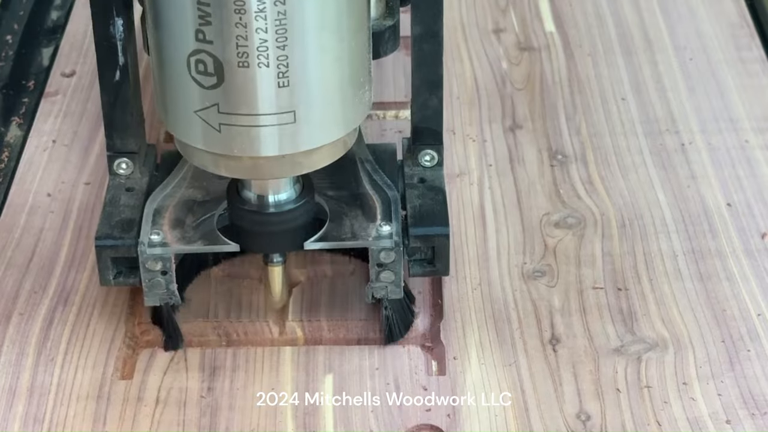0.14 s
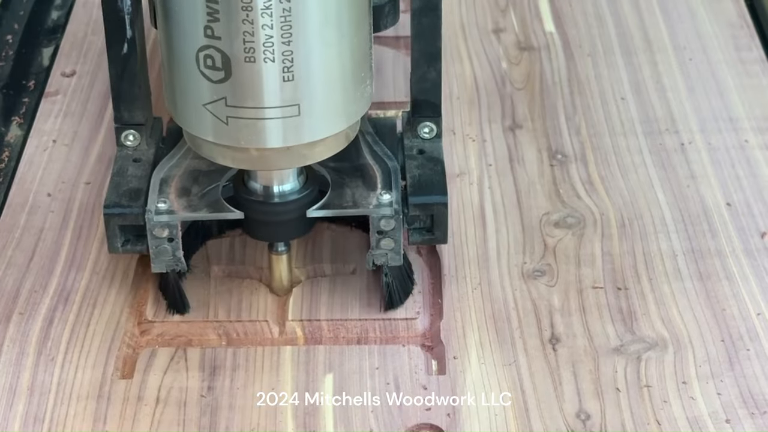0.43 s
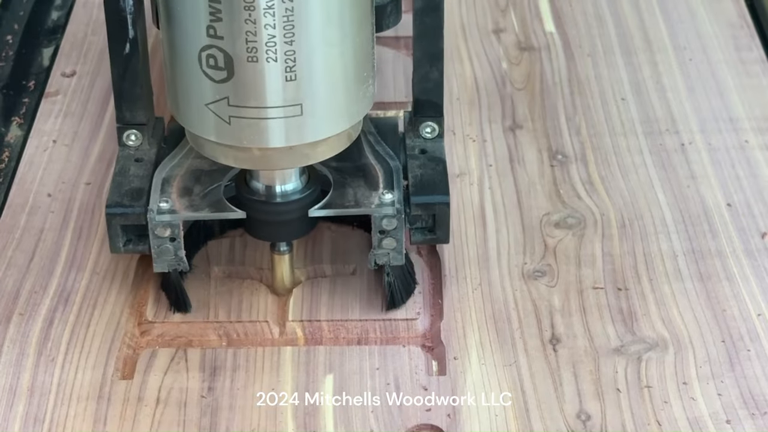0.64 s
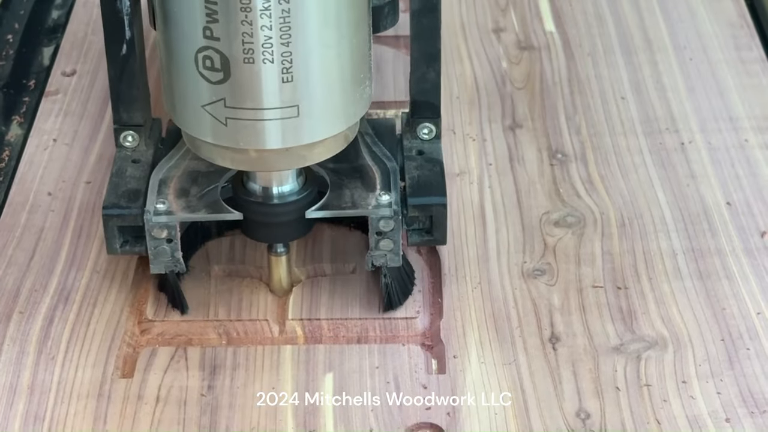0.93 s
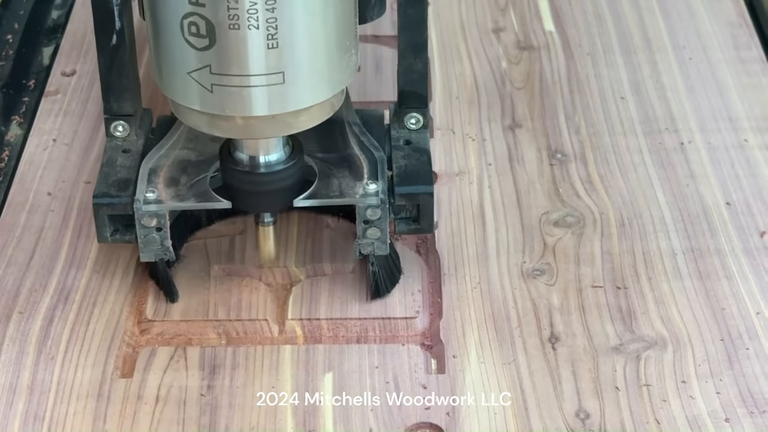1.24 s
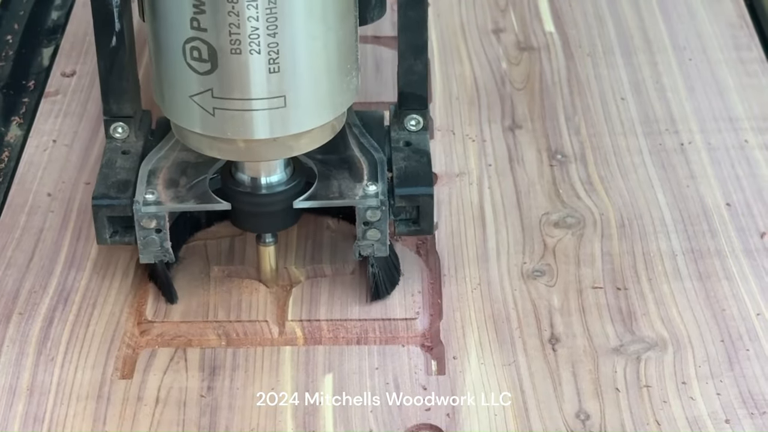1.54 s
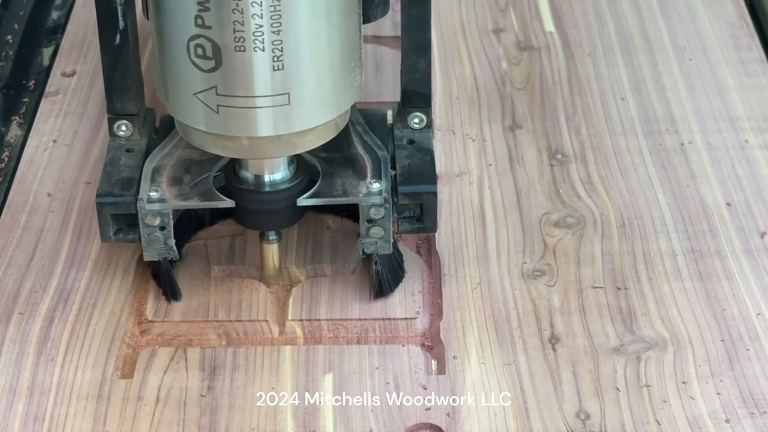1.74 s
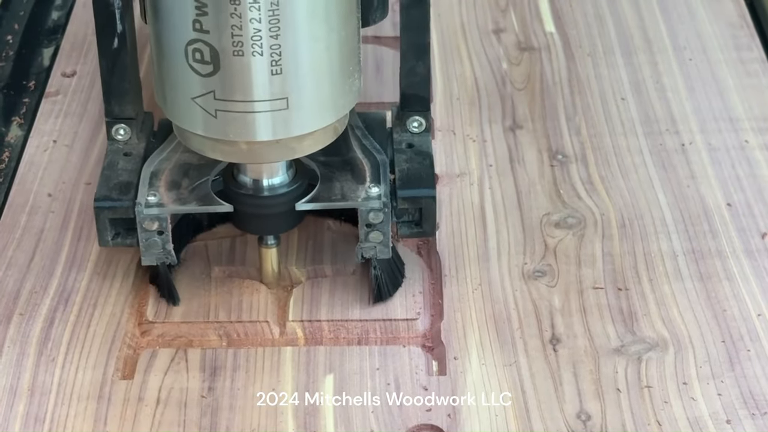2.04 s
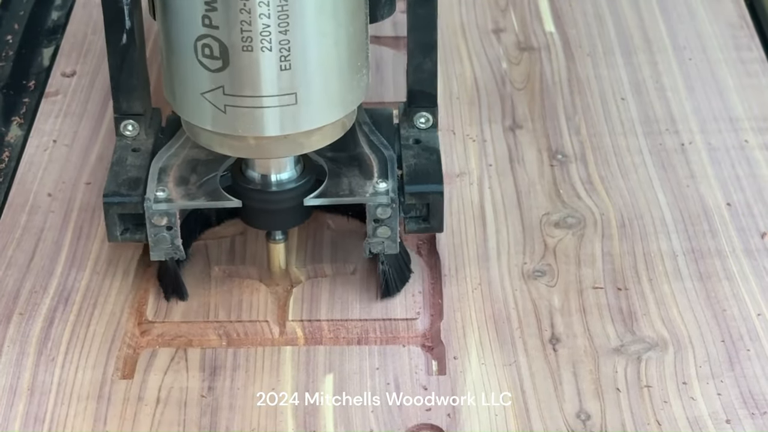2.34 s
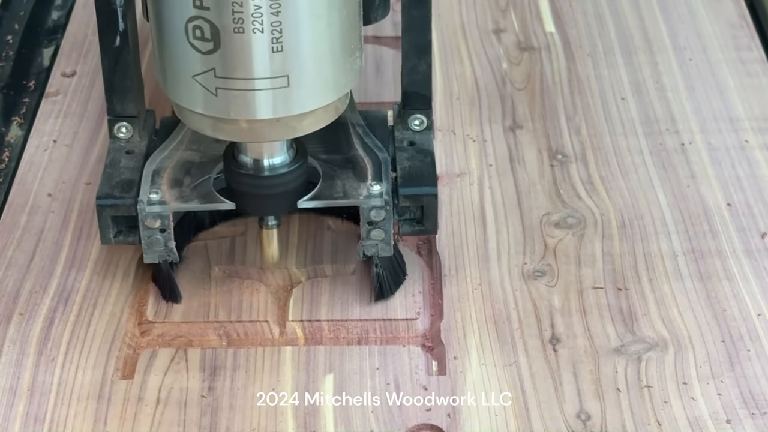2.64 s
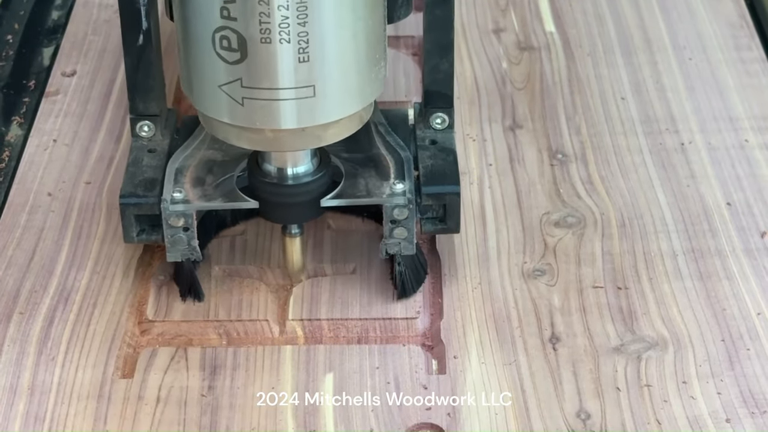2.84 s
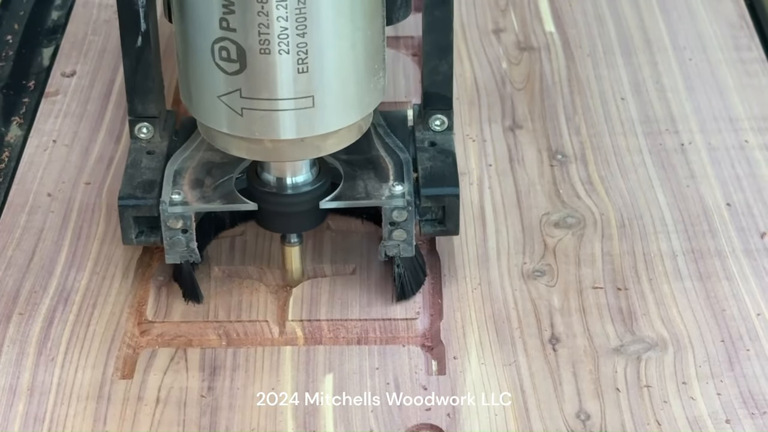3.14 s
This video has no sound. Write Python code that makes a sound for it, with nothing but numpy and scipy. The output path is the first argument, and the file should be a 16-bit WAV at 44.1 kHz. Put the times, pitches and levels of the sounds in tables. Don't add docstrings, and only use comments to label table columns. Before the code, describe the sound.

Close stereo pickup of a carving router in a small workshop: constant low hum and airy hiss, faint high whistle while moving, dull thumps at reversals, and brief crackling bursts as the bit bites wood.

```python
import sys
import numpy as np
from scipy import signal
from scipy.fft import rfft, irfft
from scipy.io import wavfile

SR = 44100
rng = np.random.default_rng(int(sys.argv[2]) if len(sys.argv) > 2 else 0)


def file_out(sig):
    cols = np.atleast_2d(sig).T
    lim = np.clip(cols, -1, 1)
    pcm = np.round(lim * 32767).astype(np.int16)
    wavfile.write(sys.argv[1], SR, pcm)


def elevation(decibels):
    levels = np.asarray(decibels, float)
    return 10 ** (levels / 20)


N = 145530
SPINDLE_HZ = 247.4


def rms_one(x):
    return x / np.sqrt(np.mean(x ** 2) + 1e-20)


def in_time(rows):
    s, *columns = np.transpose(rows)
    return [np.interp(np.arange(N) / SR, s, c) for c in columns]


def at_hz(points, hz):
    freq_hz, value = np.array(points).T
    return np.interp(np.log(hz + 1), np.log(freq_hz), value)


def drift(rate):
    r = np.exp(-80 * np.pi * rate / SR)
    white = rng.standard_normal(N // 40 + 2002)
    slow = signal.lfilter([1], [1, -2 * r, r * r], white)[2000:]
    return np.interp(np.arange(N) / 40, np.arange(len(slow)), rms_one(slow - slow.mean()))


def resonate(x, hz, width_hz):
    r = np.exp(-np.pi * width_hz / SR)
    zeros = np.array([1, 0, -1]) * (1 - r * r) / 2
    poles = [1, -2 * r * np.cos(2 * np.pi * hz / SR), r * r]
    return signal.lfilter(zeros, poles, x + 1e-18)


def gate(start, length, attack, release):
    t = np.arange(N) / SR - start
    return np.clip(t / attack, 0, 1) * np.exp(-np.maximum(t - length, 0) / release)


def tone(hz, db):
    return np.sqrt(2) * elevation(db) * np.sin(2 * np.pi * np.cumsum(hz + np.zeros(N)) / SR)


def spindle():
    # time_s, level_db
    load = [(0.0, -50.5), (0.45, -44.5), (0.5, -52), (0.66, -44.5), (0.75, -57), (0.84, -46), (1.3, -44.5),
            (1.38, -44), (2.2, -44), (2.89, -44.5), (2.9, -43), (2.97, -40), (2.99, -54), (3.05, -42),
            (3.08, -51), (3.17, -36.5), (3.21, -49), (3.3, -51)]
    level_db = in_time(load)[0] + 1.5 * drift(24.0)
    return tone(SPINDLE_HZ + 3.5 * drift(5.2), level_db)


def struck(modes, turns, depth, strength_db):
    rung = 0
    for j, (hz, width_hz, db) in enumerate(modes):
        colour = elevation(1.5 * drift(39))
        blows = np.zeros((2, N))
        blows[0, turns] = 1
        blows[1, turns] = (depth * colour)[turns] * elevation(strength_db)
        sign = -(-1) ** j
        rung = rung + sign * elevation(db) * resonate(blows, hz, width_hz)
    return rung[1] / rung[0].std()


def bit():
    # start_s, length_s, knock_db, ring_db, crack_db
    bites = [(.8984, 0.012, -39, -40, -45.5), (0.978, 0.0027, -48, -52, -54), (0.9824, 0.01, -39, -41, -46),
             (1.3602, 0.011, -47.5, -56, -63), (2.166, .008, -49, -60, -62),
             (2.177, 0.016, -42, -46.5, -55), (2.198, 0.0037, -48, -48, -52),
             (2.3333, 0.0018, -46, -53, -60), (2.3522, 0.0067, -49, -52, -51),
             (2.3848, 0.0043, -49, -49, -50), (2.3929, .018, -40.5, -43.5, -49),
             (2.415, 0.014, -37, -50, -53), (2.4327, 0.025, -41, -44, -70), (2.464, 0.0023, -49, -43, -53),
             (2.468, 0.011, -38.5, -54, -42), (2.4843, .003, -38, -46, -46),
             (2.487, 0.011, -39.5, -41, -54), (2.504, 0.014, -38, -41.5, -43.5),
             (2.532, 0.0033, -39, -53, -50), (2.5353, .009, -44, -48, -58), (3.143, 0.0017, -44, -57, -60)]
    # start_s, length_s, mode_1_db, mode_2_db, mode_3_db
    drums = [(.415, 0.035, -57, -61, -64), (.897, 0.017, -49, -53, -51.5), (.978, 0.014, -47, -41, -64),
             (1.345, 0.047, -48.5, -55, -60), (1.41, 0.15, -55.5, -57, -74), (1.64, 0.036, -56, -58, -60),
             (2.172, 0.026, -41.5, -48, -51), (2.40, 0.047, -40.5, -41, -46), (2.465, 0.075, -48, -47, -50),
             (2.885, .075, -53, -55, -59), (2.96, 0.18, -60, -56.5, -74)]
    grips = np.array([0, .8984, .9782, 1.3602, 2.166, 2.3327, 2.3522, 2.3848, 2.4637, 2.4826, 3.1457])
    # freq_hz, width_hz, level_db
    board = [
        (511, 33, -0.5),
        (761, 86, -0.5),
        (970, 93, 0),
    ]
    # freq_hz, width_hz, level_db
    knock = [(1280, 100, -11), (1490, 200, 4), (1720, 120, 1), (1956, 176, 3.5), (2153, 140, 2.5),
             (2610, 180, 0.5), (2300, 1320, -3)]
    # freq_hz, width_hz, level_db
    ring = [
        (2963, 108, 2),
        (3200, 220, 1),
    ]
    # freq_hz, width_hz, level_db
    crack = [(3700, 210, 5), (4070, 460, 6.5), (4300, 530, 0.5), (5570, 370, -5), (4300, 1700, -1.5),
             (6700, 2000, 0), (11100, 4000, -21)]
    attack_s, release_s, jitter_s, spread_db = 0.0044, 0.0025, 0.000015, 1.2

    t = np.arange(N) / SR
    latest_grip = np.searchsorted(grips, t + 0.5 / SPINDLE_HZ, "right") - 1
    gripped = t - grips[latest_grip]
    chance = rng.standard_normal((800, 2))
    bodies = [(bites, gripped, 2, knock), (bites, gripped, 3, ring), (bites, gripped, 4, crack)]
    bodies += [(drums, t, 2 + k, [mode]) for k, mode in enumerate(board)]
    out = 0
    for table, clock, column, modes in bodies:
        turns = np.flatnonzero(np.diff(np.floor(clock * SPINDLE_HZ)) == 1)[:800]
        turns = (turns + jitter_s * SR * chance[:, 0]).astype(int)
        depth = 0
        for row in table:
            contact = gate(row[0] - attack_s, row[1] + attack_s, attack_s, release_s)
            depth = depth + elevation(row[column]) * contact
        out = out + struck(modes, turns, depth, spread_db * chance[:, 1])
    return signal.sosfilt(signal.butter(2, 7500, fs=SR, output="sos"), out)


def gantry():
    # peak_s, level_db, pitch_hz
    thumps = [(0.427, -38, 263), (0.899, -34.5, 153), (1.44, -39.5, 223), (1.679, -34.5, 154),
              (1.844, -31.5, 175), (2.03, -38, 167), (2.2355, -34, 151), (2.2536, -27.5, 255),
              (2.469, -27, 264), (2.501, -37, 135), (3.047, -33, 260), (3.052, -42, 90), (3.166, -33, 250),
              (3.185, -35, 111)]
    rise_s, fall_s = 0.0073, 0.005
    t = np.arange(N) / SR
    out = 0
    for s, db, hz in thumps:
        out = out + elevation(db) * gate(s - rise_s, rise_s, rise_s, fall_s) * np.cos(2 * np.pi * hz * (t - s))
    return out


def drive():
    # start_s, end_s, level_db
    travels = [
        (.36, 1.1, -62.5),
        (1.31, 2.63, -64),
        (2.83, 3.4, -62.5),
    ]
    moving = sum(elevation(db) * gate(a, b - a, attack=0.026, release=0.015) for a, b, db in travels)
    return moving * tone(11994 + 10.6 * drift(23), 1.5 * drift(25))


def extractor():
    # time_s, pitch_hz, level_db
    blade_tone = [(0.0, 564, -45), (1.21, 564.6, -43), (1.43, 564.8, -43.5), (2.66, 566.3, -43.5),
                  (3.21, 568, -43), (3.3, 565, -42.5)]
    hz, db = in_time(blade_tone)
    return tone(hz + 1.66 * drift(11.5), db - 0.5 * drift(36))


def whistles():
    # freq_hz, width_hz, level_db
    cavities = [(1797, 110, -63.5), (2548, 65, -60.5), (3950, 24, -70), (5770, 28, -66.5), (7660, 160, -60),
                (7950, 60, -62), (8400, 80, -59), (12400, 80, -76)]
    white = rng.standard_normal(N)
    out = 0
    for hz, width_hz, db in cavities:
        narrow = resonate(resonate(white, hz, width_hz), hz, width_hz)
        out = out + elevation(db) * rms_one(narrow)
    return out


def air(spectrum, patchy_db, rate):
    hz = np.fft.rfftfreq(N, 1 / SR)
    low, high = spectrum[0][0], spectrum[-1][0]
    shape = rfft(rng.standard_normal((2, N))) * elevation(at_hz(spectrum, hz)) * (hz > low) * (hz < high)
    place = np.log((hz + 1) / low) / np.log(high / low) * 3
    together = drift(rate)
    out = 0
    for k in range(4):
        band = np.sqrt(np.clip(1 - abs(place - k), 0, 1))
        flicker = elevation(patchy_db * (together + drift(rate)))
        out = out + flicker * irfft(shape * band, N)
    return rms_one(out)


def rushing_air():
    # time_s, level_db over the mean
    flow = [(0, -2.5), (.2, -1.5), (.35, 0), (1.2, 1.5), (2.2, 2), (3.3, 2.5)]
    # freq_hz, density_db per Hz
    rumble = [(70, -18), (130, -5), (190, -4), (260, -1), (330, -8.5), (480, -9), (700, -11), (900, -32)]
    # freq_hz, density_db per Hz
    rush = [(700, 0.5), (900, -4.5), (1300, 1.5), (1800, -1), (2500, 1.5), (3000, -2.5), (3400, -8.5),
            (5600, -10)]
    # freq_hz, density_db per Hz
    jet = [(5400, -18.5), (6200, 2), (6450, -1.5), (6750, 4), (7200, -6.5), (7600, -1.5), (8500, -7),
           (8900, -9)]
    # freq_hz, density_db per Hz
    hiss = [(8700, -10), (9600, 0), (10200, -0.5), (11000, -6.5), (12200, -11), (12800, -24),
            (13600, -17.5), (15900, -14)]
    flow_db, = in_time(flow)
    swirl_hz = 43.9 + 1.5 * drift(2.3)
    swirl_db = 1.76 * np.sin(2 * np.pi * np.cumsum(swirl_hz) / SR)
    out = elevation(-49.5 + 0.76 * flow_db) * air(rumble, patchy_db=1.0, rate=21)
    out += elevation(-48 + 0.3 * flow_db) * air(rush, patchy_db=0.5, rate=40)
    out += elevation(-50 + 0.83 * flow_db + swirl_db) * air(jet, patchy_db=0.92, rate=62)
    out += elevation(-55 + 0.2 * flow_db + swirl_db) * air(hiss, patchy_db=0.7, rate=36)
    return out


def dust_hose():
    # time_s, level_db
    gusts = [(0.0, -65), (1.04, -60), (1.36, -66), (1.43, -53), (1.87, -64), (2.59, -58), (2.76, -72),
             (3.01, -61), (3.05, -48), (3.12, -66), (3.17, -57), (3.3, -54)]
    level_db = 0.94 * (in_time(gusts)[0] + 56.5) - 56.5
    spectrum = [(18, -3), (30, -6), (70, 1.5), (130, -8.5)]  # freq_hz, density_db
    return elevation(level_db) * air(spectrum, patchy_db=0.5, rate=5.9)


def shop(x):
    t60_s, level_db = 0.2, -20
    t = np.arange(int(0.4 * SR)) / SR
    dull = signal.lfilter([0.4], [1, -0.6], rng.standard_normal((2, len(t))))
    tail = dull * elevation(-60 * t / t60_s)
    tail = tail / np.sqrt((tail ** 2).sum(1, keepdims=True))
    return elevation(level_db) * signal.fftconvolve(x[None], tail, axes=1)[:, :N]


def scene():
    blows = bit() + gantry()
    out = rushing_air() + dust_hose() + shop(blows)
    out[0] += blows + spindle() + drive() + extractor() + whistles()
    return out


def top_cut(x):
    return signal.sosfilt(signal.butter(12, 15790, fs=SR, output="sos"), x)


def record(dry):
    # freq_hz, phase_rad
    lead = [(2500, 0), (3500, 0.68), (4900, 0.34), (5300, 0), (6300, 0), (7200, 1.09), (7750, 2.5),
            (7950, 3), (8800, 2), (9200, 1.57), (10200, 0.6), (11100, 0), (13600, 0.5), (16000, -4)]
    # freq_hz, level_db
    unshared = [(60, -25), (400, -12), (850, -5), (1500, -23), (2500, -20.5), (3700, -18), (5300, -31),
                (7200, -31), (8400, -39), (9100, -15), (10700, -9), (13400, -30), (14000, -2.5)]
    # freq_hz, level_db
    tilt = [(60, 1), (250, 1.5), (560, 3.5), (1000, 2.5), (1600, 0)]
    # low_hz, high_hz
    no_mid = [(7900, 8930), (12720, 12900), (15760, 30000)]
    # low_hz, high_hz
    no_side = [(1900, 2150), (5170, 6300), (11030, 13300), (15760, 30000)]
    hz = np.fft.rfftfreq(N, 1 / SR)
    both, apart = rfft(dry)
    sign = np.array([[1], [-1]])
    ports = both + sign * apart * elevation(at_hz(unshared, hz))
    turned = ports * np.exp(0.5j * sign * at_hz(lead, hz))
    left, right = turned * elevation(0.5 * sign * at_hz(tilt, hz))
    mid, side = left + right, left - right
    for low_hz, high_hz in no_mid:
        mid[(hz > low_hz) & (hz < high_hz)] = 0
    for low_hz, high_hz in no_side:
        side[(hz > low_hz) & (hz < high_hz)] = 0
    mix = irfft((mid + sign * side) / 2, N)
    return top_cut(mix)


dry = scene()
out = record(dry)
file_out(out)
```